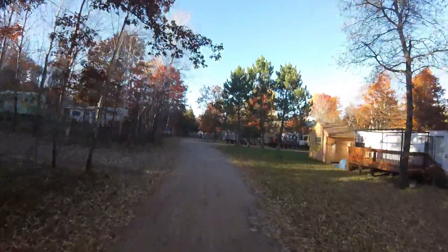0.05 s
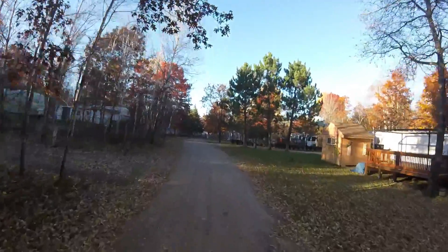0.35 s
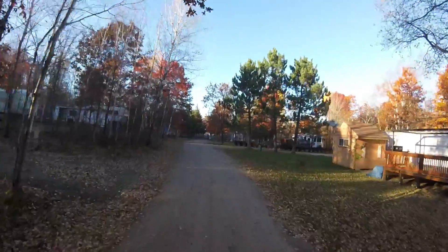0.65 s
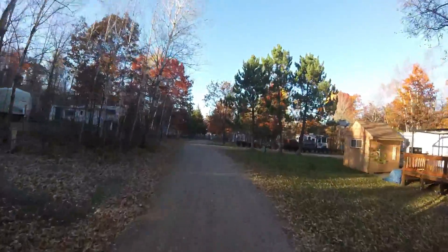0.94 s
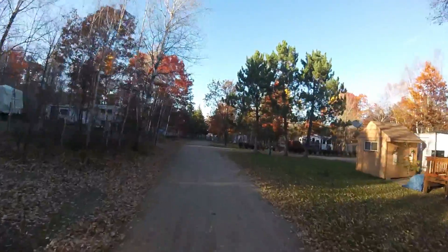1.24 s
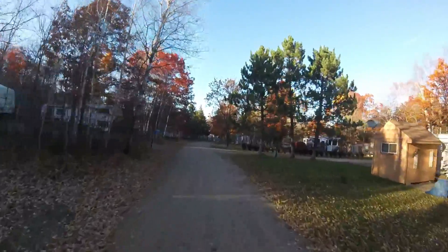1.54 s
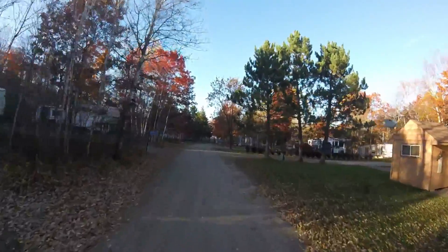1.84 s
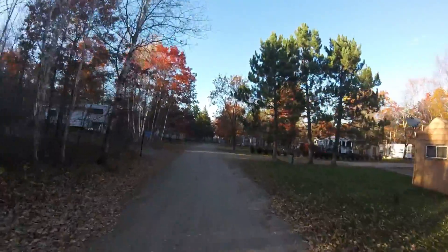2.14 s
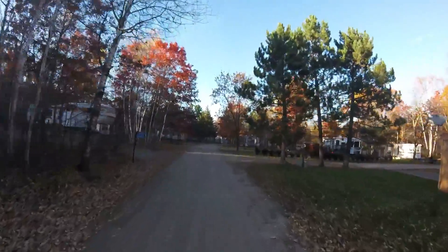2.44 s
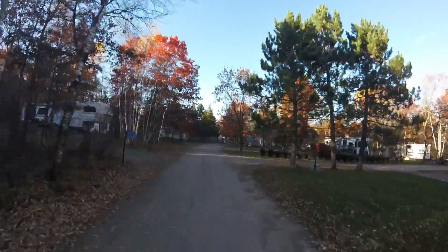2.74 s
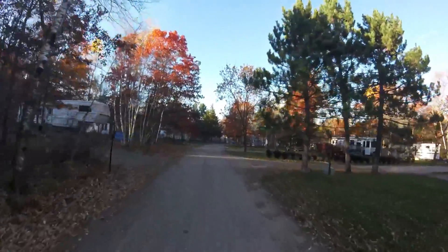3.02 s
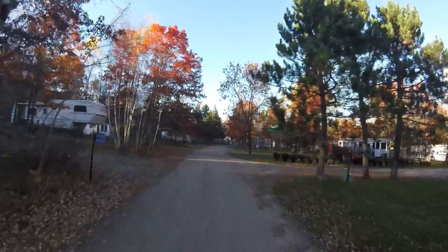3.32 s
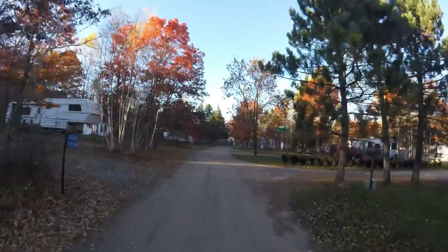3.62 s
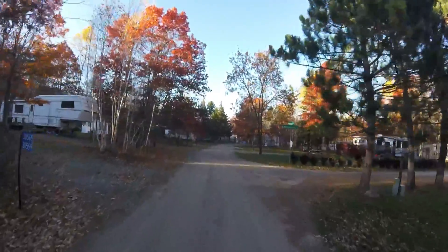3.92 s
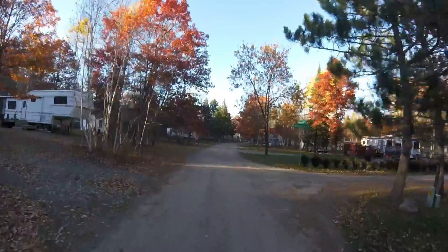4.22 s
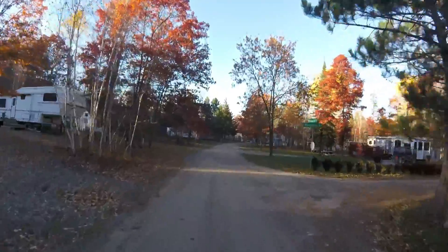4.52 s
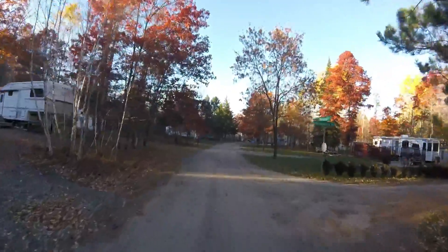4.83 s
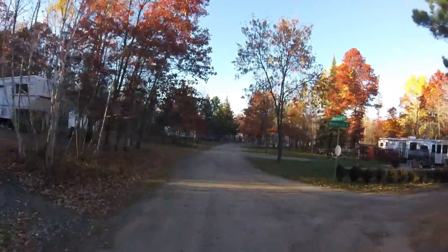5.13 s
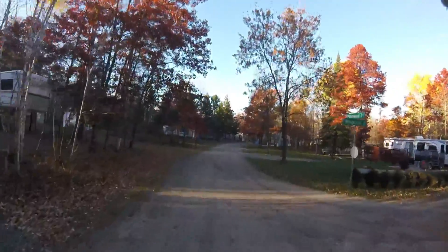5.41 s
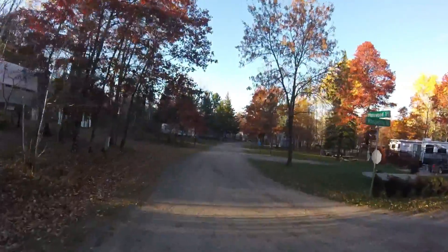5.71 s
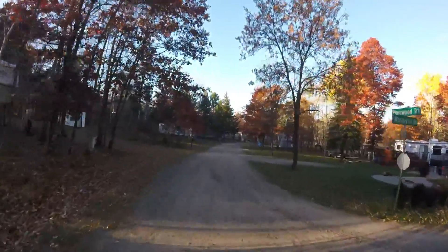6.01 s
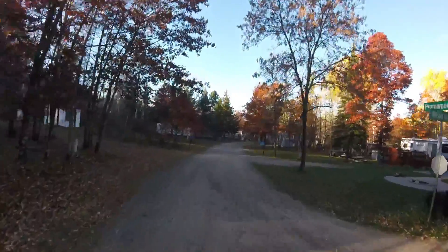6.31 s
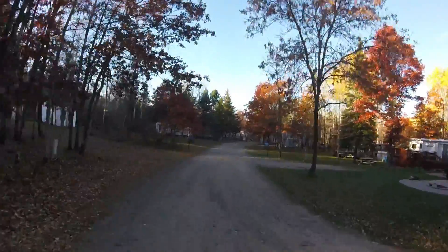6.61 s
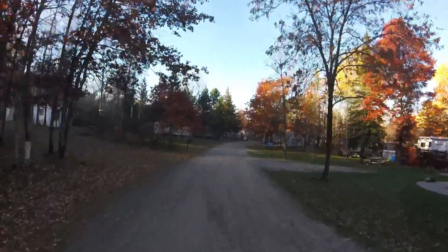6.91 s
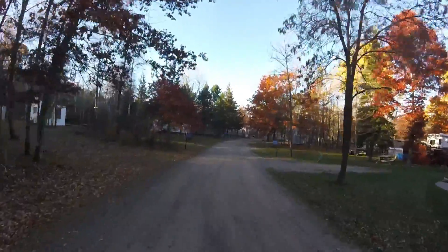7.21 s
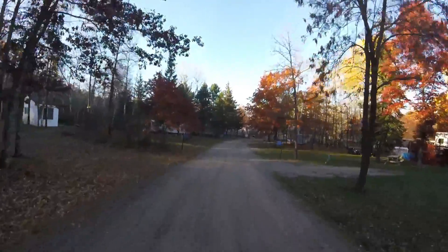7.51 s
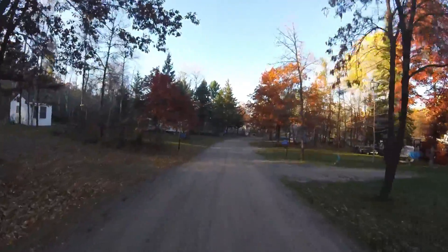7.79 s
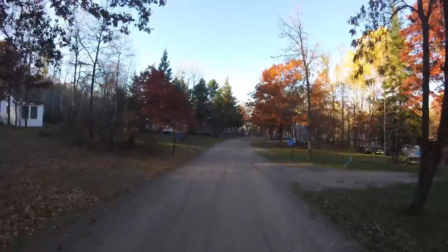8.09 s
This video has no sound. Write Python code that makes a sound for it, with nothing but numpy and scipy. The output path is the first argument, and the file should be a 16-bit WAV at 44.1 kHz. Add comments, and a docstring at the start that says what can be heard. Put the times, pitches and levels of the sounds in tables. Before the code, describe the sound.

Deep wheel rumble and the gritty crunch of a dirt lane carry on throughout, picked up from on board a moving cart outdoors. A loose part gives a few light clacks, then a short run of even taps, then irregular rattles. After about five seconds the rattling grows busier, with faint buzzing and snapping pebbles, and stones knock hollowly against the cart more and more often until the end.

```python
"""A cart rolls along a gravel and dirt lane, a small camera fixed to its frame. From the start the frame
rumbles over ruts and grit rings its panels, over a soft hiss of air and the camera's thin whine. A loose
part clacks twice at the start, taps evenly after a second, and clacks more often from two seconds on,
when pebbles begin to snap. Past five seconds the lane gets rougher: the part buzzes and faint tones come
and go. Larger stones, rare at first, knock on the panels thick and fast near the end."""
import sys
import numpy as np
from scipy import signal
from scipy.fft import rfft, irfft
from scipy.io import wavfile
from scipy.ndimage import uniform_filter1d

SR = 44100
rng = np.random.default_rng(int(sys.argv[2]) if len(sys.argv) > 2 else 0)


def to_wav(s):
    """Save 16-bit WAV."""
    ch = np.atleast_2d(s).T  # columns
    pcm = np.round(np.clip(ch, -1, 1) * 32767)  # PCM
    wavfile.write(sys.argv[1], SR, pcm.astype(np.int16))


N = 359415
TIME = np.arange(N) / SR

# Table levels are relative: a function may turn a whole table up or down.
# How hard the lane shakes the cart: t/s, bounce level/dB, tyre level/dB
SHAKE = [(0, -17, -21.5), (0.54, -18, -17.5), (0.85, -21.5, -21), (1.65, -19, -21), (2.2, -23, -23),
         (2.8, -23, -21.5), (3.35, -22.5, -20.5), (3.75, -21, -20.5), (4.3, -16.5, -18.5),
         (5.05, -19.5, -17), (5.4, -17, -18.5), (6.2, -18, -17), (6.8, -20, -21.5), (7.15, -16, -21),
         (7.5, -20, -21.5), (8.1, -15, -21.5)]
# The deep sound of the frame on its springs: f/Hz, level/dB
BOUNCE_SPECTRUM = [(4, -15.5), (13, -1), (22, -4), (28, 4), (36, -2.5), (60, -4.5), (75, -9), (110, -22.5),
                   (250, -83.5)]
# The drumming of the tyres: f/Hz, level/dB
TYRE_SPECTRUM = [(35, -36), (60, -1.5), (75, -2), (100, -3.5), (130, -7), (170, -10), (250, -15),
                 (320, -19.5), (450, -27.5), (700, -37), (1400, -73.5)]

def rumble(bounce_db, tyres_db, damping, lump_db):
    """The frame bounces on springs, dampers even out the swings, and the tyres drum over lumpy ground."""
    sway = noise(BOUNCE_SPECTRUM)
    swing_size = np.sqrt(uniform_filter1d(abs(signal.hilbert(sway)) ** 2, size=4000))
    bounce = unit_rms(sway / swing_size ** damping) * gain_curve(SHAKE, column=1)
    drum = unit_rms(noise(TYRE_SPECTRUM) * gain_of(lump_db * drift(10))) * gain_curve(SHAKE, column=2)
    return gain_of(bounce_db) * bounce + gain_of(tyres_db) * drum


# How much grit the tyres crush: t/s, level/dB
GRIT = [(0, -33), (0.3, -31.5), (0.8, -34.5), (2.0, -34), (2.4, -33), (3.5, -32), (4.3, -34), (5.3, -33),
        (6.65, -33), (7.25, -31.5), (7.45, -34.5), (7.58, -31), (7.7, -28.5), (8.15, -33.5)]
# The hollow ring of the cart's panels: f/Hz, level/dB
PANEL_SPECTRUM = [(150, -26.5), (300, -10.5), (450, -6), (680, -5.5), (760, -1.5), (810, -5), (870, 0),
                  (960, -3), (1120, -5), (1195, -14.5), (1250, -12), (1350, -24), (1700, -28.5),
                  (4000, -44)]

def gravel(db, grains_per_s, spread_db, clump_db):
    """Grit is crushed in clumps; each grain rings the panels."""
    grains = clicks(grains_per_s, spread_db) * gain_of(clump_db * drift(39))
    crunch = signal.oaconvolve(grains, ring(lambda hz: spectrum_gain(PANEL_SPECTRUM, hz)))[:N]
    return gain_of(db) * unit_rms(crunch) * gain_curve(GRIT)


# Larger stones under a tyre: t/s, peak level/dB, middle of the ring f/Hz
STONES = [(0.2884, -18, 700), (1.6234, -23, 890), (3.1249, -18, 760), (3.1971, -16.5, 830),
          (3.442, -23, 870), (3.9733, -15.5, 880), (4.5873, -18, 890), (5.2353, -12.5, 740),
          (5.6454, -15, 760), (5.8181, -15.5, 860), (5.975, -15.5, 850), (6.1488, -19, 800),
          (6.3534, -13.5, 570), (6.4074, -17, 1000), (6.5718, -26, 920), (6.5956, -21, 980),
          (6.675, -24, 980), (6.6878, -20, 1000), (6.8542, -18, 760), (6.9658, -17, 620),
          (7.136, -16.5, 600), (7.2347, -19, 1040), (7.5979, -14, 720), (7.6428, -18.5, 780),
          (7.659, -22, 780), (7.7251, -15, 680), (7.7396, -12.5, 620), (7.7614, -19, 770),
          (7.8008, -21, 1000), (7.8382, -17, 790), (7.8633, -18, 890), (7.8809, -19, 640),
          (7.9288, -17, 1020), (7.9559, -15.5, 790), (7.97, -22, 890), (8.0008, -16, 860),
          (8.0334, -11, 690), (8.0375, -20, 800), (8.0638, -19.5, 700)]

def stones(db, width_hz, grind_db, grind_rise_s, size=2600):
    """Each stone gives the panels one hollow knock, then grinds on the grit as the tyre rolls off it."""
    out = np.zeros(N)
    pressure = swell(np.arange(size) / SR, grind_rise_s)
    for s, peak_db, centre_hz in STONES:
        knock = panel_ring(centre_hz, width_hz)
        outline = abs(signal.hilbert(knock))
        grind = signal.fftconvolve(rng.standard_normal(size) * pressure, knock)[:size]
        add(out, s - outline.argmax() / SR, gain_of(peak_db + db) * knock / outline.max())
        add(out, s, gain_of(peak_db + db + grind_db) * grind / abs(grind).max())
    return out


def panel_ring(centre_hz, width_hz):
    """A struck panel rings mostly around one pitch."""
    return ring(lambda hz: spectrum_gain(PANEL_SPECTRUM, hz) / (1 + ((hz - centre_hz) / width_hz) ** 2))


def through_frame(knocks, top_hz):
    """The frame muffles a knock: it carries little above the panels' ring."""
    return signal.sosfilt(signal.butter(6, top_hz, fs=SR, output="sos"), knocks)


# The pitches the loose part rings at: f/Hz, width/Hz, level/dB
PART_RINGS = [(1930, 92, -2), (2400, 90, -2.5), (2696, 210, -0.5), (3230, 630, -11), (3700, 370, -7.5),
              (4850, 270, -16)]
# The bare click of one contact: f/Hz, level/dB
CLICK_SPECTRUM = [(500, -24), (1300, 6), (1700, -10), (2100, -4.5), (2800, -2.5), (3800, -17), (4300, -20),
                  (6000, -22.5), (8000, -33), (10500, -37), (15000, -56.5)]

def loose_part_gain(hz, hard_db=0, ring_hz=2450, ring_db=0, reach_hz=260):
    """The loose part rings on top of a click; where it is hit brings out the pitches near ring_hz."""
    ring_power = sum(gain_of(db) ** 2 / (1 + (2 * (hz - f) / width) ** 2) ** 2
                     for f, width, db in PART_RINGS)
    click_power = (gain_of(-3.5) * spectrum_gain(CLICK_SPECTRUM, hz)) ** 2
    octaves = np.clip(np.log2((hz + 1) / 2600), -.4, .8)
    colour_db = hard_db * octaves + ring_db * hump(hz, ring_hz, reach_hz)  # a harder hit is brighter
    return np.sqrt(ring_power + click_power) * gain_of(colour_db)


# Jolts knock the loose part against its stops:
# t/s, level/dB, rise time/s, hardness/(dB per octave), favoured ring f/Hz
CLACKS = [(0.156, -41.5, 0.0033, -3, 2550), (0.236, -41.5, 0.0045, -9, 2550),
          (2.165, -43.5, 0.0033, 0, 2300.0), (2.205, -30.5, 0.0016, 2, 3750),
          (2.2055, -32.5, 0.003, -1, 2000), (2.311, -41, 0.0027, -7, 2650),
          (2.472, -43.5, 0.0055, -6, 2600.0), (3.526, -31, 0.0026, 0, 2880),
          (3.761, -38.5, 0.0048, -2, 2750), (3.815, -42, 0.0045, -2, 3700.0),
          (3.975, -43, 0.0061, 1, 2300.0), (4.023, -45, 0.0035, -1, 2900.0),
          (4.055, -45.0, 0.0041, -6, 2600.0), (4.431, -46.5, 0.0026, 8, 2750),
          (4.508, -45.5, 0.0024, 1, 2900.0), (4.579, -43.0, 0.0015, 3, 2860),
          (4.607, -44, 0.0091, 6, 2600.0), (4.676, -44, 0.0078, -9, 2600.0),
          (4.757, -45, 0.0035, -9.0, 2610), (4.841, -40.5, 0.0035, -4, 2450),
          (5.102, -41.5, 0.0038, -11, 2770), (5.181, -44.5, 0.0024, 2, 2300), (5.234, -45, 0.003, 3, 1950),
          (5.26, -41.5, 0.0033, -2, 2750), (5.321, -44, 0.0022, -3, 2750), (5.344, -38, 0.0035, -5, 2650),
          (5.628, -43.5, 0.007, -1, 1950.0), (5.725, -42, 0.003, 0, 3150), (5.805, -41, 0.0055, -5, 2450.0),
          (5.887, -48, 0.0025, -11, 2750.0), (5.966, -38.5, 0.0074, -13, 2440),
          (6.044, -36.5, 0.0052, -4, 2600.0), (6.084, -44, 0.0026, -5, 2750.0),
          (6.127, -36.5, 0.007, -9.0, 2600.0), (6.202, -43, 0.0045, -16, 2740),
          (6.357, -38, 0.0082, -1, 2450.0), (6.428, -41.5, 0.0031, -11, 2600.0),
          (6.453, -43, 0.0021, -15, 2300.0), (6.503, -40, 0.0043, -13, 2450.0),
          (6.529, -47, 0.0025, 4, 2750), (6.5825, -31.5, 0.0024, -7, 2700), (6.633, -47, 0.003, 0, 2750),
          (6.6415, -32.5, 0.0018, 0, 3800), (6.6615, -32, 0.0025, -2, 2550),
          (6.739, -34.5, 0.0037, -2, 2560), (6.789, -45, 0.0094, 8, 1950.0),
          (6.817, -35, 0.0055, -9.0, 2600.0), (6.899, -41.5, 0.0048, -11, 2600.0),
          (6.98, -45.5, 0.0035, -6, 2750.0), (7.036, -37, 0.0037, -1.5, 2100.0),
          (7.056, -45, 0.0076, -9.0, 2600.0), (7.137, -34.5, 0.0088, -9.5, 2620),
          (7.177, -42, 0.0045, -6, 2450.0), (7.224, -34, 0.005, -7.5, 2000),
          (7.256, -39.5, 0.0028, 1, 1950.0), (7.294, -35.5, 0.0076, -7, 2450.0),
          (7.374, -44, 0.0045, -10, 2750.0), (7.407, -47, 0.0022, 1, 2600.0),
          (7.462, -39.5, 0.0036, -2, 2900.0), (7.518, -42.5, 0.0076, -7, 2750.0),
          (7.603, -41.5, 0.0028, 0, 2290), (7.639, -42.5, 0.0032, 8, 2650), (7.691, -42, 0.0045, 8, 2100.0),
          (7.809, -45, 0.0017, 5, 2750.0), (7.888, -45.5, 0.0018, -3, 2300.0),
          (7.94, -41.5, 0.0075, 0, 1950.0), (7.991, -39.5, 0.003, 5, 2350), (8.101, -51, 0.0016, 5, 2750),
          (8.109, -37.5, 0.0034, 1, 3150)]

def rattles(blows, db, ring_db, reach_hz, slam_db, slam_s, settle_db, settle_s, contacts_per_s):
    """At each blow the loose part bounces in a quick run of contacts, slams home, then settles."""
    size = 2600
    out, t = np.zeros(N), np.arange(size) / SR
    for s, blow_db, rise_s, hard_db, ring_hz in blows:
        body = ring(lambda hz: loose_part_gain(hz, hard_db, ring_hz, ring_db, reach_hz))
        settling = gain_of(settle_db) * np.minimum(t / rise_s, 1) * np.exp(-t / settle_s)
        force = swell(t, rise_s) + settling
        contacts = force * rng.choice([-1, 1], size) * (rng.random(size) < contacts_per_s / SR)
        # blows that rise faster than slam_s slam hard
        slam = gain_of(slam_db) * np.exp(-rise_s / slam_s) * np.linalg.norm(contacts)
        add(contacts, rise_s, np.array([slam]))
        burst = signal.fftconvolve(contacts, body)[:size]
        add(out, s, gain_of(blow_db + db) * unit_rms(burst))
    return out


def rocking_taps(from_s, to_s, per_s, first_db, fade_db_per_s, rise_s, hard_db, ring_hz):
    """On smooth ground the loose part rocks in even, fading taps; gives rows like those of CLACKS."""
    taps = []
    for s in np.arange(from_s, to_s, 1 / per_s):
        tap_db = first_db - fade_db_per_s * (s - from_s) + rng.normal(0, 1.7)
        taps.append((s, tap_db, rise_s, hard_db, rng.normal(ring_hz, 90)))
    return taps


def panel_thuds(blows, centre_hz, width_hz, delay_s, rise_s, size=2600):
    """Each rattle shakes the panel behind it into a short hollow knock a moment later."""
    out = np.zeros(N)
    push = swell(np.arange(size) / SR, rise_s)
    body = panel_ring(centre_hz, width_hz)
    for s, blow_db, blow_rise_s, *_ in blows:
        thud = signal.fftconvolve(rng.standard_normal(size) * push, body)[:size]
        add(out, s + blow_rise_s + delay_s, gain_of(blow_db) * unit_rms(thud))
    return out


# Rough stretches of the lane: middle t/s, reach to either side/s, level/dB
ROUGH_STRETCHES = [(5.27, 0.084, -52), (6.06, 0.12, -52.5), (6.66, 0.15, -55), (7.23, 0.16, -61.5),
                   (7.7, 0.28, -56)]

def buzz(clump_db, panel_db, rest_db):
    """On rough ground the loose part never rests: tiny contacts ring it and the panel behind it."""
    roughness = sum(gain_of(db) * hump(TIME, s, reach_s) for s, reach_s, db in ROUGH_STRETCHES)
    contacts = clicks(per_s=2500, spread_db=2) * gain_of(clump_db * drift(35))
    part = signal.oaconvolve(contacts, ring(loose_part_gain))[:N]
    panel = signal.oaconvolve(contacts, ring(lambda hz: spectrum_gain(PANEL_SPECTRUM, hz)))[:N]
    return (unit_rms(part) + gain_of(panel_db) * unit_rms(panel)) * (gain_of(rest_db) + roughness)


# Pebbles snapping under a tyre: t/s, peak level/dB, fade time of the splintering/s
SNAPS = [(2.311, -54, 0.0008), (3.528, -52, 0.001), (3.764, -45, 0.001), (4.024, -53, 0.001),
         (4.621, -55, 0.001), (4.902, -54, 0.0002), (5.173, -53, 0.0002), (5.182, -44, 0.0008),
         (5.237, -48, 0.001), (5.323, -56, 0.001), (5.426, -52, 0.0002), (5.649, -48, 0.0002),
         (5.684, -52, 0.0002), (6.53, -47, 0.0012), (6.586, -51, 0.002), (6.6345, -48, 0.0012),
         (6.6425, -51, 0.001), (6.7415, -42, 0.0016), (7.181, -55, 0.001), (7.208, -55, 0.0008),
         (7.229, -50, 0.002), (7.411, -50, 0.002), (8.102, -51, 0.001)]
# The bright sound of one snap: f/Hz, level/dB
SNAP_SPECTRUM = [(1200, -11.5), (3000, 0.5), (4400, -6), (6000, -0.5), (7500, -0.5), (8800, -11.5),
                 (10500, -10), (12500, -14), (15000, -30)]

def pebbles(db, splinter_db, tick_db, ticks_per_s, spread_db, size=600):
    """Pinched pebbles snap against each other; finer ones tick at random, louder in thick grit."""
    out, t = np.zeros(N), np.arange(size) / SR
    body = ring(lambda hz: spectrum_gain(SNAP_SPECTRUM, hz))
    first_click = t == 0
    for s, peak_db, fade_s in SNAPS:
        splinters = gain_of(splinter_db) * rng.standard_normal(size) * np.exp(-t / fade_s)
        crack = signal.fftconvolve(first_click + splinters, body)
        add(out, s, gain_of(peak_db + db) * crack / abs(crack).max())
    ticks = signal.oaconvolve(clicks(ticks_per_s, spread_db), body)[:N]
    return out + gain_of(tick_db) * ticks * gain_curve(GRIT)


# The hiss of air and far leaves: f/Hz, level/dB
HISS_SPECTRUM = [(300, -3.5), (1500, 5.5), (2000, 3), (2450, 9.5), (3000, 0), (3400, 2.5), (3850, 4),
                 (4250, -5.5), (5700, -1), (7000, -5.5), (8500, -14), (10500, -16.5), (12500, -27.5),
                 (15000, -46.5)]

def air(db, flutter_db, early_db, early_s):
    """Air and far leaves make a soft, fluttering hiss, a little stronger at first."""
    level_db = db + flutter_db * drift(49) + early_db * hump(TIME, 0, early_s)
    return gain_of(level_db) * noise(HISS_SPECTRUM)


# Faint passing tones: middle t/s, reach to either side/s, f/Hz, level/dB
PASSING_TONES = [(5.25, 0.24, 2390, -61.5), (5.95, 0.18, 2360, -62.5), (6.3, 0.16, 4054, -71)]

def passing_tones(waver_hz):
    """Faint wavering tones come and go, likely from the cart's drive."""
    out = np.zeros(N)
    for s, reach_s, hz, db in PASSING_TONES:
        phase = 2 * np.pi * np.cumsum(hz + waver_hz * drift(12)) / SR
        out += gain_of(db) * hump(TIME, s, reach_s) * np.sqrt(2) * np.sin(phase)
    return out


# The high tones in the camera's whine: f/Hz, level/dB
WHINE_TONES = [(9530, -99), (9590, -88.5), (9650, -82.5), (9710, -99)]

def camera_whine():
    """A thin electric whine; its tones lie 60 Hz apart, so it pulses sixty times a second."""
    return sum(gain_of(db) * np.sqrt(2) * np.sin(2 * np.pi * (hz * TIME + rng.random()))
               for hz, db in WHINE_TONES)


def gain_of(db):
    """Turns decibels into a number to multiply a sound by."""
    return 10 ** (np.asarray(db) / 20)


def unit_rms(x):
    """Scales a sound so that its average strength (rms) is one."""
    return x / np.sqrt(np.mean(x ** 2) + 1e-20)


def hump(x, middle, reach):
    """A smooth hill, one high at its middle."""
    return np.exp(-((x - middle) / reach) ** 2)


def swell(t, rise_s):
    """Climbs to one in rise_s, then dies away."""
    return t / rise_s * np.exp(1 - t / rise_s)


def gain_curve(rows, column=1):
    """Joins a table's levels over time into a gain for every sample."""
    rows = np.asarray(rows)
    return gain_of(np.interp(TIME, rows[:, 0], rows[:, column]))


def spectrum_gain(spectrum, hz):
    """Joins a table's levels over pitch into a gain; it falls away above the last row."""
    f, db = np.transpose(spectrum)
    return gain_of(np.interp(np.log(hz + 1), np.log(f), db)) / np.maximum(hz / f[-1], 1) ** 4


def noise(spectrum):
    """Noise with the given spectrum (its mix of low and high pitches)."""
    hz = np.fft.rfftfreq(N, 1 / SR)
    return unit_rms(irfft(rfft(rng.standard_normal(N)) * spectrum_gain(spectrum, hz), N))


def drift(per_s):
    """A random wander that changes up to about per_s times a second."""
    hz = np.fft.rfftfreq(N, 1 / SR)
    return unit_rms(irfft(rfft(rng.standard_normal(N)) * hump(hz, 0, per_s), N))


def ring(gain_at, size=4096):
    """The sound of an object after one sharp tap, given its gain at each frequency."""
    log_gain = np.log(gain_at(abs(np.fft.fftfreq(size, 1 / SR))) + 1e-6)
    response = np.exp(np.conj(signal.hilbert(log_gain)))  # no sound comes before the tap
    sound = np.fft.ifft(response).real[:size // 2]
    return sound / np.linalg.norm(sound)


def clicks(per_s, spread_db):
    """Random tiny hits: many small, a few large."""
    strength = gain_of(spread_db * np.minimum(rng.exponential(1, N), 4))
    return strength * rng.choice([-1, 1], N) * (rng.random(N) < per_s / SR)


def add(mix, s, sound):
    """Mixes a sound in at time s."""
    part = mix[max(round(s * SR), 0):][:len(sound)]
    part += sound[:len(part)]


def scene():
    """Everything heard from the moving cart, in one channel."""
    rolling = rumble(bounce_db=5.0, tyres_db=-1.1, damping=0.65, lump_db=1.53)
    rolling += gravel(db=-0.03, grains_per_s=3500, spread_db=1.4, clump_db=1.15)
    background = air(db=-55.5, flutter_db=1.17, early_db=2.2, early_s=0.66)
    background += camera_whine() + passing_tones(waver_hz=4)
    blows = CLACKS + rocking_taps(from_s=1.171, to_s=1.9, per_s=12.6, first_db=-42.855, fade_db_per_s=5,
                                  rise_s=0.00452, hard_db=-8.5, ring_hz=2550)
    knocks = stones(db=-0.44, width_hz=350, grind_db=-7.5, grind_rise_s=0.0046)
    knocks += panel_thuds(blows, centre_hz=1020, width_hz=190, delay_s=0.00045, rise_s=0.0035)
    chatter = buzz(clump_db=4.5, panel_db=15, rest_db=-65.0)
    chatter += rattles(blows, db=-8.5, ring_db=6.0, reach_hz=480, slam_db=1, slam_s=0.0025,
                       settle_db=-21, settle_s=0.015, contacts_per_s=6000)
    snaps = pebbles(db=4, splinter_db=-8, tick_db=-31.5, ticks_per_s=30, spread_db=2.5)
    return (rolling + through_frame(knocks, top_hz=1510) + chatter + snaps + background)[None]


def record(dry):
    """The camera rounds off the largest swings and cuts the highest treble."""
    rounding_from, headroom, top_hz = .65, .22, 15700
    excess = np.maximum(abs(dry) - rounding_from, 0)
    rounded = dry - np.sign(dry) * (excess - headroom * np.tanh(excess / headroom))
    treble_cut = signal.firwin(511, top_hz, window=("kaiser", 9), fs=SR)
    return signal.oaconvolve(rounded, treble_cut[None], "same")


dry = scene()
out = record(dry)
to_wav(out)
```